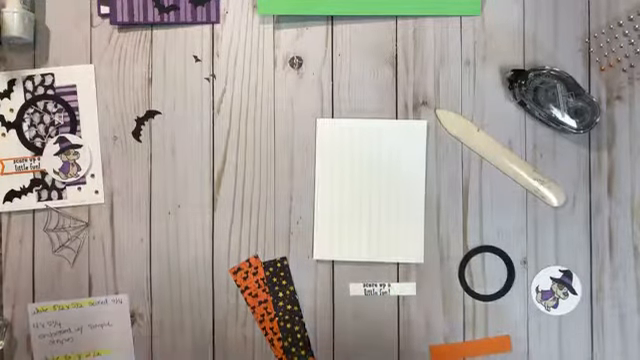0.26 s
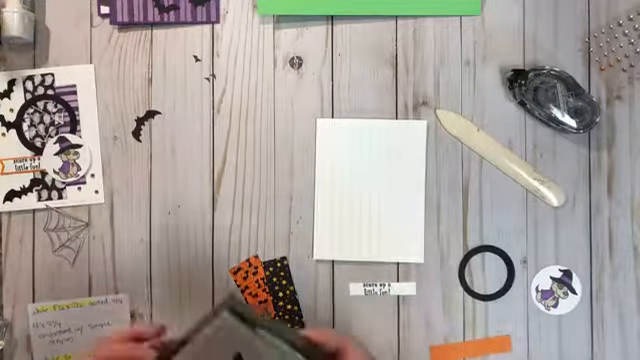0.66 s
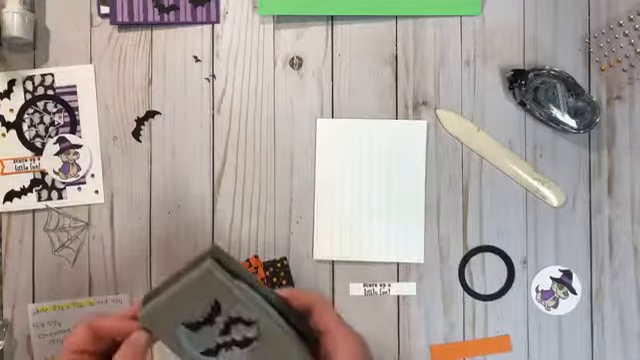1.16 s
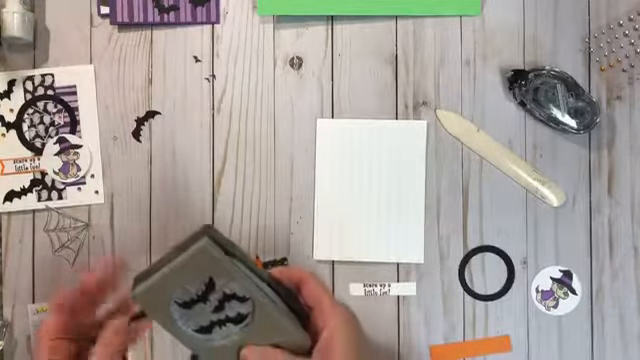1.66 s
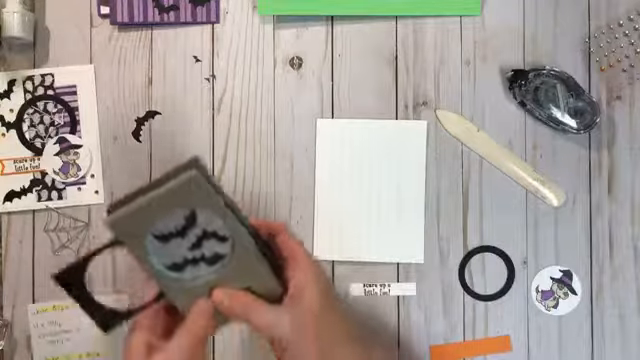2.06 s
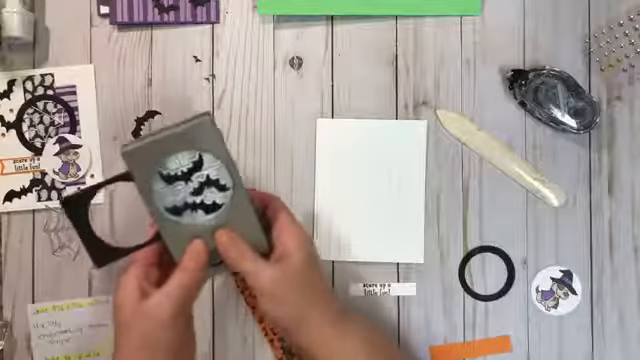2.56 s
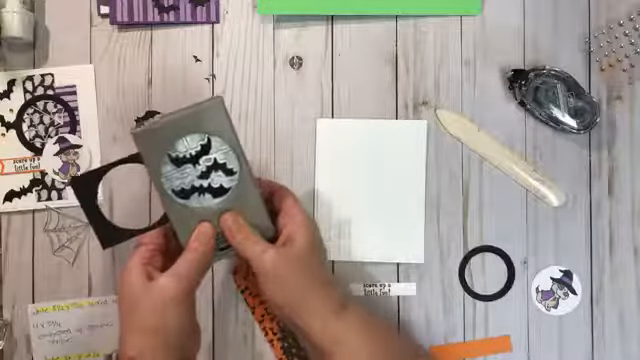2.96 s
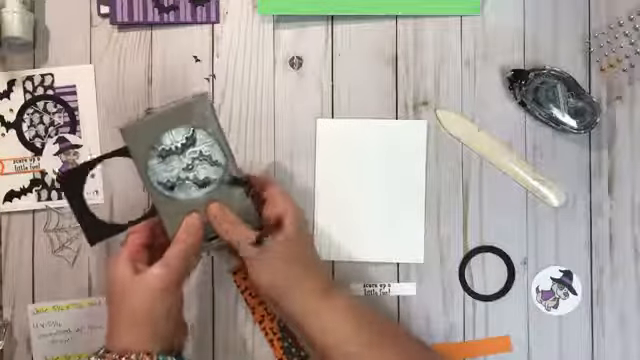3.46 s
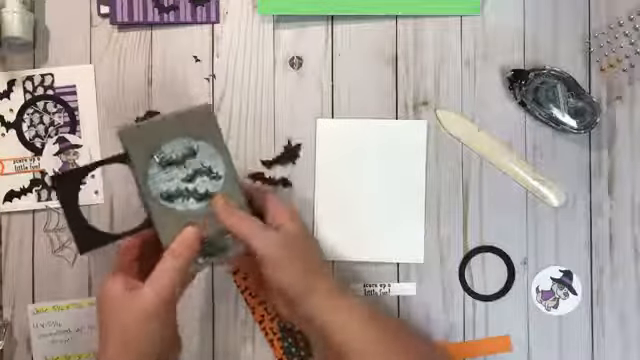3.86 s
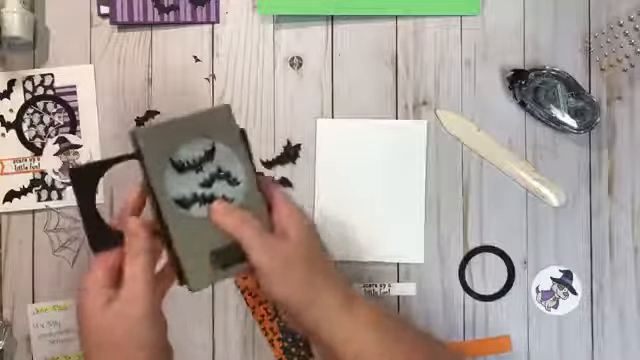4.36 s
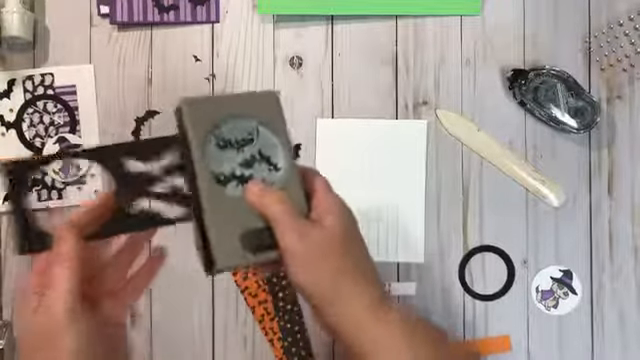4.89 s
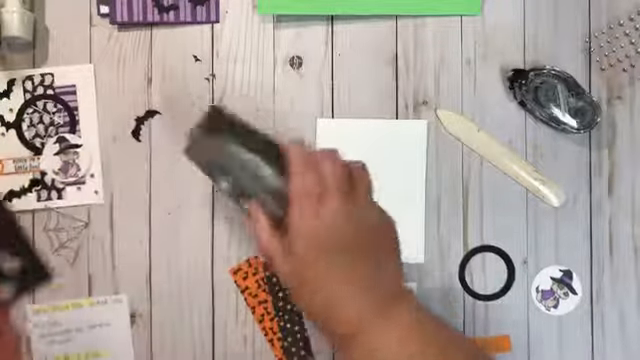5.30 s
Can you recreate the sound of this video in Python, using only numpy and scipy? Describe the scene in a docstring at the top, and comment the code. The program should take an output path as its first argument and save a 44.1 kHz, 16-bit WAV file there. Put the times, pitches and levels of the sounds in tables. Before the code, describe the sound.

A quiet small room with soft hiss and a faint wavering low hum, heard close up. From 0.2 to 0.7 seconds light ticks and a dry card scrape, strongest near 0.45, with a dull table bump. A soft brush at 0.75, then a fainter scrape and ticks from 0.9 to 1.2. Sparse, barely audible touches follow until 2.2. At 2.3-2.5 the punch bites in a tight cluster of crunchy, mid-pitched snaps; a weaker rustling crackle comes around 2.7. A sharp single snap at 2.95 leads to the loudest event at 3.2: a double crack, bright and tearing, with a low table thump and short room tail. Rough scraping dies away to 3.7, where the lever releases in three rapid springy metallic ticks. Faint brushing and touches until 4.5, then a bright, hissy card slide from 4.7, peaking near 5.0, tiny rubs at 5.2, and quiet.

```python
"""A quiet room, where a hand-held craft punch is worked over a table. Card slides into its slot, the dies
bite through in short tearing snaps, the lever springs back with small ticks and the card is drawn out.
Tearing, touching and rubbing are runs of tiny random breaks that excite the resonances of the punch body.
The lever rings modes of its own, jolts shake the table at low pitch, and a hush with a wavering hum
lies beneath; the room answers with early echoes and a short tail."""
import sys
import numpy as np
from scipy import signal
from scipy.io import wavfile
from scipy.ndimage import uniform_filter1d

SR = 44100
rng = np.random.default_rng(int(sys.argv[2]) if len(sys.argv) > 2 else 0)


def log_audio(samples):
    """Write samples as a 16-bit WAV file to the path given in sys.argv[1]."""
    # one column per channel
    frames = np.atleast_2d(samples).T
    # limit to full scale, then quantise
    limited = np.clip(frames, -1, 1)
    pcm = np.round(limited * 32767).astype(np.int16)
    wavfile.write(sys.argv[1], SR, pcm)


N = 244081  # length in samples


def gain_of(db):
    """Level is logarithmic: decibels become an amplitude ratio."""
    return 10 ** (np.asarray(db) / 20)


def evened(x):
    """Effective amplitude: scales a signal to rms 1."""
    return x / np.sqrt(np.mean(x ** 2) + 1e-20)


def read(points, hz):
    """Interpolates a spectrum on a logarithmic frequency axis."""
    f, value = np.transpose(points)
    return np.interp(np.log(hz + 1), np.log(f + 1), value)


def add(mix, s, sound):
    """Superposition: adds a sound into the mix at s seconds."""
    part = mix[round(s * SR):][:len(sound)]
    part += sound[:len(part)]


def resonate(x, hz, width):
    """A resonance of peak gain 1: shifts hz down to zero, smooths, and shifts back."""
    turn = np.exp(2j * np.pi * np.cumsum(hz * np.ones(len(x))) / SR)
    r = np.exp(-np.pi * width / SR)  # damping per sample
    smooth = signal.lfilter([1 - r], [1, -r], x / turn + 1e-18)
    return 2 * (turn * smooth).real


def steep(x, hz, width):
    """Two equal resonances in cascade fall off twice as steeply away from their peak."""
    return resonate(resonate(x, hz, width), hz, width)


def ring(drive, modes):
    """Modal superposition: one force rings a set of modes, neighbours in opposite phase."""
    total = 0
    for k, (hz, width, db) in enumerate(modes):
        total = total + (-1) ** k * gain_of(db) * resonate(drive, hz, width)
    return total


def no_bass(x, hz):
    """Radiation efficiency: an object small against the wavelength radiates little bass."""
    return signal.sosfilt(signal.butter(2, hz, "high", fs=SR, output="sos"), x)


def lumps(count, size):
    """Smoothed noise: chance of rms 1 that varies in lumps about size samples long."""
    return evened(uniform_filter1d(uniform_filter1d(rng.standard_normal(count), size=size), size=size))


def fibres(count, grit_db):
    """Fracture of fibres: a dense run of tiny random breaks, a few of them large."""
    return rng.standard_normal(count) * gain_of(grit_db * np.minimum(rng.exponential(1, count), 4))


def burst(ms, swell):
    """A transient force: breaks that swell for a share of their few milliseconds, then die."""
    u = np.arange(1500) / SR / (max(ms, .3) / 1000)  # time as a share of the burst
    swell = np.clip(swell, .03, .9)
    rise = (u / swell) ** 2
    fall = np.clip((1 - u) / (1 - swell), 0, 1)
    return np.where(u < swell, rise, fall) ** .7 * fibres(len(u), 1.5)


def at_level(sound, db):
    """Short-time level: sets the loudest 3 ms to db."""
    return gain_of(db) * sound / np.sqrt(uniform_filter1d(sound ** 2, size=130).max())


def hush():
    """Stationary noise: room tone and microphone hiss in faint drifting patches, and narrow-band hum."""
    # Spectrum of the hush. Each row: frequency in Hz, relative density in dB per Hz.
    spectrum = [(12, -39), (20, -13), (127, -4.5), (187, -10), (499, -17), (1570, -27), (1860, -25.5),
                (2080, -27), (2320, -27), (5230, -32.5), (14300, -30.5), (16000, -22)]
    # The wavering hum. Each row: frequency in Hz, level in dB, bandwidth in Hz.
    hum_bands = [(60, -72, 2.6), (110.5, -76, 3.4), (241, -75.5, 15)]
    hush_db, patch_db = -65, 1.3  # rms levels
    frames, hz = N // 512 + 5, np.fft.rfftfreq(2048, 1 / SR)
    a, b, patches = rng.standard_normal((frames, 1025, 3)).T
    # patches some 430 Hz wide and 120 ms long
    patches = evened(uniform_filter1d(uniform_filter1d(patches, size=20, axis=0), size=10, axis=1))
    z = (a + 1j * b) * gain_of(read(spectrum, hz)[:, None] + patch_db * patches)
    air = gain_of(hush_db) * evened(signal.istft(z, nperseg=2048, noverlap=1536)[1][:N])
    hum = 0
    for f, db, width in hum_bands:
        hum = hum + gain_of(db) * evened(resonate(rng.standard_normal(N), f, width))
    return air + hum


def brush(s, db, rise_ms, fall_ms, slot_hz, body_db, hiss_db):
    """Resonance driven by a swelling force: a brush or low murmur, loudest at s, rises and fades."""
    edge_hz, edge_db, thud_db, thud_hz = 3800, -5.5, -15, 710
    fade_db = 20  # it starts and ends this far below its loudest
    times = s - max(rise_ms, 5) / 1000, s, s + max(fall_ms, 5) / 1000
    drops_db = fade_db, 0, fade_db
    rows = [(at, db - drop_db, edge_hz, body_db, hiss_db) for at, drop_db in zip(times, drops_db)]
    return stroke(rows, slot_hz, edge_db, thud_db, thud_hz)


def punch_body(drive, slot_hz, body_db, hiss_db, thud_db, thud_hz):
    """Forced resonance: one force rings the slot, the upper modes, the bare tear and a low thud."""
    # Modes of the punch body above the slot. Each row: frequency in Hz, width in Hz, level in dB.
    body_modes = [(1500, 800, -8.5), (2696, 540, -6.5), (3100, 550, -5), (4210, 1000, -7),
                  (5590, 750, -13.5)]
    # Bands of the bare tearing. Each row: frequency in Hz, width in Hz, level in dB.
    hiss_bands = [(6020, 1100, -19), (8950, 1800, -15), (10660, 3000, -17), (14800, 3600, -22.5)]
    slot_width_hz, thud_width_hz = 493, 520  # of each of the two cascaded resonances
    slot = no_bass(steep(drive, slot_hz, slot_width_hz), 330)
    body = gain_of(body_db) * ring(drive, body_modes)
    hiss = gain_of(hiss_db) * ring(drive, hiss_bands)
    upper = no_bass(body + hiss, 1300)
    thud = no_bass(gain_of(thud_db) * steep(drive, thud_hz, thud_width_hz), 100)
    return slot + upper + thud


def flexing(x):
    """Changing radiation: as the card bends, patches of the spectrum above the slot swell and sink."""
    patch_db = 2.5  # rms depth
    hz, t, z = signal.stft(x, SR, nperseg=256, noverlap=192)
    # patches some 700 Hz wide and 30 ms long
    patches = rng.standard_normal((len(t), len(hz))).T
    patches = evened(uniform_filter1d(uniform_filter1d(patches, size=4, axis=0), size=20, axis=1))
    bent = z * gain_of(patch_db * patches * (hz[:, None] > 2000))
    return signal.istft(bent, SR, nperseg=256, noverlap=192)[1][:N]


def room(x):
    """Reverberation: early echoes, then sparse taps of random sign, each band decaying at its own rate."""
    # Decay of the room. Each row: frequency in Hz, time to fall by 60 dB in seconds.
    decay = [(250, 0.54), (700, 0.25), (1080, 0.65), (1450, 0.49), (4600, 0.41), (12000, 0.39)]
    # Echoes from the table and near walls. Each row: delay in ms, level in dB.
    echoes = [(5.5, -15), (9.3, -21.5), (13.7, -22.5), (19.1, -22.5)]
    tail_db = -12.5
    taps = np.zeros(SR)
    at = np.arange(350, SR - 20, 20)
    taps[at + rng.integers(0, 20, len(at))] = rng.choice([-1., 1.], len(at))
    hz, t, z = signal.stft(taps, SR, nperseg=256)
    tail = signal.istft(z * gain_of(-60 * t / read(decay, hz)[:, None]), SR, nperseg=256)[1]
    tail = gain_of(tail_db) * tail / np.linalg.norm(tail)
    for ms, db in echoes:
        add(tail, ms / 1000, gain_of([db]) * rng.choice([-1., 1.]))
    return signal.fftconvolve(no_bass(x, 330), tail)[:N]


def tick(s, db, slot_hz, bright_db):
    """Impact excitation: one light touch of finger or card edge heard through the punch."""
    length_ms, swell = 7.7, 0.14
    hiss_over_body_db, thud_db, thud_hz = 1.5, -16, 626
    drive = burst(length_ms, swell)
    sound = punch_body(drive, slot_hz, bright_db, bright_db + hiss_over_body_db, thud_db, thud_hz)
    return s, at_level(sound, db)


def jolt(s, db, t60):
    """Decaying forced vibration: a rough shudder rings the low modes of the table."""
    # Dull modes of the table. Each row: frequency in Hz, width in Hz (applied twice), level in dB.
    table_modes = [(149, 48, -14.5), (278, 360, -12.5), (540, 22, -14), (910, 110, 5)]
    t = np.arange(SR // 2) / SR
    onset = np.minimum(t / 0.0066, 1)
    shudder = rng.standard_normal(len(t)) * onset * gain_of(-60 * t / max(t60, .03))
    sound = sum(gain_of(g) * steep(shudder, hz, width) for hz, width, g in table_modes)
    return s, at_level(sound, db)


def stroke(rows, slot_hz, edge_db, thud_db, thud_hz):
    """Friction excitation: clumped breaks of rubbing card ring the punch and a moving edge resonance."""
    edge_width_hz, flicker_db = 480, 5  # the edge catches and lets go
    overtone, overtone_db = 1.32, -8.5  # second, weaker resonance of the card edge
    s, *columns = np.transpose(rows)
    t = np.arange(s[0], s[-1], 1 / SR)
    level_db, edge_hz, body_db, hiss_db = (np.interp(t, s, c) for c in columns)
    # clumps a few milliseconds long
    drive = gain_of(2.2 * lumps(len(t), size=120)) * fibres(len(t), 1.3)
    sound = punch_body(drive, slot_hz, body_db, hiss_db, thud_db, thud_hz)
    edge = steep(drive, edge_hz, edge_width_hz)
    edge = edge + gain_of(overtone_db) * steep(drive, overtone * edge_hz, edge_width_hz)
    catching_db = flicker_db * np.clip(lumps(len(t), size=600), -2, 1)
    sound += gain_of(body_db + edge_db + catching_db) * edge
    # the slow loudness is divided out, so the level follows its curve
    power = uniform_filter1d(uniform_filter1d(sound ** 2, size=3000), size=3000)
    slow = np.sqrt(abs(power) + 1e-20)
    fade = signal.windows.tukey(len(t), 150 / len(t))
    return s[0], gain_of(level_db) * sound / slow * fade


def snap(s, db, ms, swell, *body):
    """Shear fracture: the dies tear the card in one burst, heard through the punch."""
    return s, at_level(punch_body(burst(ms, swell), *body), db)


def release(s, db, ms):
    """Free vibration after a slip: the lever lets go sharply and rings its own modes."""
    # Modes of the lever. Each row: frequency in Hz, width in Hz, level in dB.
    lever_modes = [(1500, 1000, -8), (2710, 180, 8), (4070, 340, 2), (5720, 1100, -8), (8150, 3000, -21.5),
                   (13000, 5000, -29.5)]
    return s, at_level(no_bass(ring(burst(ms, 0.042), lever_modes), 1010), db)


def clicks():
    """Superposed transients: all ticks, snaps and releases as they leave the punch in one direction."""
    # Fingers and card edges. Each row: start in seconds, level in dB, slot pitch in Hz,
    # brightness over the slot in dB.
    ticks = [(0.191, -51.5, 710, -16), (0.199, -53, 1110, 24), (0.214, -54.5, 1280, 10),
             (0.296, -56, 1420, 22), (0.326, -50.5, 1540, 24), (.350, -49, 1550, 14),
             (0.378, -47, 1720, -5), (0.932, -57, 1490, 0), (0.984, -49.5, 1410, -8),
             (1.226, -58.5, 1410, -14), (1.385, -69, 1400, -6), (1.476, -61, 1320, -17),
             (1.693, -55, 1260, -13), (1.966, -60, 1240, -13), (1.993, -56, 1250, -10),
             (2.161, -64.5, 1260, -12), (2.731, -50, 1300, 6.5), (3.87, -60, 1307, -7),
             (4.228, -63, 1340, -4), (4.417, -58, 1330, 0.5), (4.466, -57.5, 1310, -5),
             (5.206, -63, 1128, -6.5)]
    # The dies shearing card. Each row: start in seconds, level in dB, length in ms, share of it that
    # swells, slot pitch in Hz, body in dB, hiss in dB, thud in dB, thud pitch in Hz.
    snaps = [(2.286, -35, 5.6, 0.18, 1390, -9.5, -6, -22, 506),
             (2.354, -22, 5.5, 0.12, 1290, -13.5, -11, -16.5, 490),
             (2.370, -20, 15, 0.53, 1180, -4.5, -3, -11, 532.5),
             (2.418, -23.5, 13.5, 0.38, 1220, -5, -6, -7.5, 545),
             (2.499, -26.5, 8.3, 0.3, 1450, 0.5, -3, -9, 465.5),
             (2.660, -38.5, 13, 0.19, 1200, -4, -2.5, -13, 570),
             (2.687, -35, 19, 0.3, 1310, 0, 4, -12, 556.4),
             (2.949, -17, 7.5, 0.72, 1338, -2, -2, -16.5, 557),
             (3.1826, -14.5, 10, 0.19, 1250, 0.5, -3, -15.5, 560),
             (3.19, -12.5, 7.7, 0.35, 1150, 0.5, -5.5, -17.5, 600),
             (3.219, -11, 16.8, 0.17, 1600, 9, 11, -9.5, 900),
             (3.232, -22, 16, 0.2, 1300, 4.5, 10, -7, 868)]
    # The lever letting go in steps. Each row: start in seconds, level in dB, length in ms.
    releases = [(3.7312, -36.5, 5.3), (3.7454, -35, 4.7), (3.7559, -26.5, 3.4)]
    out = np.zeros(N)
    for play, rows in (tick, ticks), (snap, snaps), (release, releases):
        for row in rows:
            add(out, *play(*row))
    return out


def scene():
    """Direct and reverberant field: punch and card close by, and the room gathering them from three sides."""
    # Brushes, short and long, of card and fingers, and one faint low murmur, perhaps a hand on the table.
    # Each row: loudest moment in seconds, level in dB, rise in ms, fall in ms, slot pitch in Hz,
    # body in dB, hiss in dB.
    brushes = [(.17, -63.5, 21, 46, 1330, 6, 12), (0.259, -63, 61, 31, 1300, 9, 9),
               (.745, -54.5, 30, 145, 1450, 0.5, -1), (1.2, -73, 200, 850, 480, -30, -30),
               (1.236, -61, 13, 35, 1410, -4, -3), (1.33, -72, 56, 300, 1390, -8, -15),
               (1.695, -63.5, 45, 39, 1240, -2, 2.5), (2.041, -76, 34, 470, 1230, -10, -12),
               (2.189, -67, 70, 120, 1270, 2.5, 15.5), (3.178, -50.5, 34, 13, 1200, 6, 8),
               (2.681, -47, 33.3, 66, 1260, -4, 4), (2.76, -67, 32, 750, 1170, -0.5, 6),
               (3.83, -63, 40, 200, 1400, 9, 10.5), (3.93, -63, 60, 40, 1300, 8, 24),
               (4.078, -56, 41, 61, 1425, 4.5, -0.5), (4.162, -68, 30, 51, 1418, 5, -0.5),
               (4.25, -65.5, 30, 120, 1320, 6, 9), (4.425, -61.5, 18.5, 73, 1310, 2, 2.5),
               (4.476, -63, 15, 206, 1340, -1, 4.5), (5.09, -76, 55, 297, 1200, -4, -6),
               (5.228, -66.5, 25, 40, 1210, 5, 10.5), (5.268, -69, 15, 30, 1210, 6, 13)]
    # The press jolting hands and table. Each row: start in seconds, level in dB,
    # time to fall by 60 dB in seconds.
    jolts = [(.2, -59.5, 0.21), (.44, -52, 0.11), (2.376, -53, 0.29), (2.953, -60.5, 0.18),
             (3.187, -46, .15), (3.224, -30.5, .5)]
    # Long slides of card, one curve each. Each row of a curve: time in seconds, level in dB,
    # card edge pitch in Hz, body in dB, hiss in dB.
    strokes = [
        [(.3, -63, 4270, -3, 13), (.34, -55, 4300, 14.5, 4), (.408, -49, 4550, 6.5, 5),
         (.435, -39, 4400, 7.5, 1.5), (.49, -41, 4130, 11.5, 9), (.512, -43.5, 4450, 4, 3.5),
         (.6, -51, 4600, 0, 0), (.69, -59.5, 4000, -5, 1.5), (.72, -57.5, 4600, -1, -4)],
        [(.915, -74, 4000, 4, 1), (.935, -51.5, 4000, -5.5, -2.5), (.99, -56.5, 4340, 2.5, 5),
         (1.025, -54.5, 4080, 3.5, 6), (1.087, -55.5, 4050, -14, -13), (1.1, -56, 4100, -9.5, -8),
         (1.17, -59, 4100, -10, -8), (1.215, -75, 4050, -1, -6)],
        [(3.245, -23, 4000, 2, 2), (3.279, -29, 3940, 4, 3), (3.379, -46, 4000, 16.5, 12),
         (3.46, -43, 3900, 1.5, -1.5), (3.52, -49.5, 4130, -2, 2.5), (3.56, -45.5, 3730, -1, 1),
         (3.595, -49, 3700, -3, -1), (3.638, -41, 2960, -1, 3), (3.694, -57.5, 3400, -1.5, 0),
         (3.725, -57.5, 3750, 2, 5)],
        [(4.66, -68, 4440, -2.5, -1), (4.708, -59.5, 4550, 10.5, 10), (4.806, -44.5, 3500, 7, 11.5),
         (4.85, -50.5, 4110, 10, 19), (4.9, -45.5, 4365, 8, 14.5), (4.94, -47, 3700, 10, 20),
         (4.984, -35, 4100, 8, 16.5), (5.018, -64, 4150, 18, 22), (5.04, -76.5, 4150, 17, 24)],
    ]
    # What rings in each long slide. Each row: slot pitch in Hz, edge over the body in dB,
    # thud in dB, thud pitch in Hz.
    stroke_tones = [(1510, -1.5, -12, 525), (1430, -3.5, -19, 760), (1300, -11, -10, 940),
                    (1460, -10.5, -11.5, 740)]
    rubbing_room_db = -1.5  # rubbing reaches the walls weaker than the clicks
    spring_hz, spring_width_hz, spring_db = 1074, 2, 3.5  # a thin ring that lingers after the clicks

    rubbing, table = np.zeros((2, N))
    for row in brushes:
        add(rubbing, *brush(*row))
    for rows, tones in zip(strokes, stroke_tones):
        add(rubbing, *stroke(rows, *tones))
    rubbing = flexing(rubbing)
    for row in jolts:
        add(table, *jolt(*row))
    # each direction has its own fine detail
    walls = sum(room(clicks() + gain_of(rubbing_room_db) * rubbing) for _ in range(3)) / np.sqrt(3)
    near = clicks()
    spring = gain_of(spring_db) * resonate(near, spring_hz, spring_width_hz)
    return (near + spring + rubbing + table + walls + hush())[None]


def record(dry):
    """Band limitation: a linear-phase low-pass, the upper limit of the recorder."""
    edge_hz = 15850
    low_pass = signal.firwin(255, edge_hz, window=("kaiser", 7), fs=SR)
    return signal.oaconvolve(dry, low_pass[None], "same")


dry = scene()
out = record(dry)
log_audio(out)
```